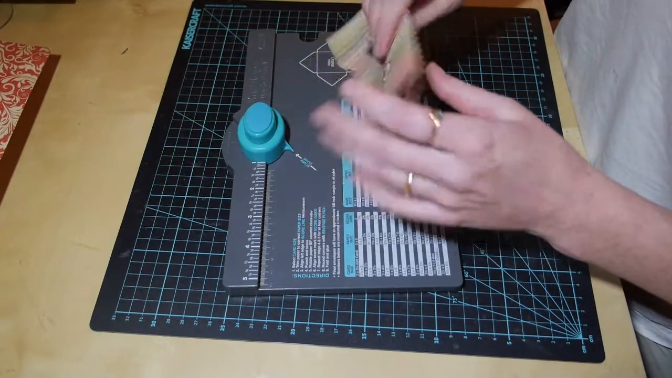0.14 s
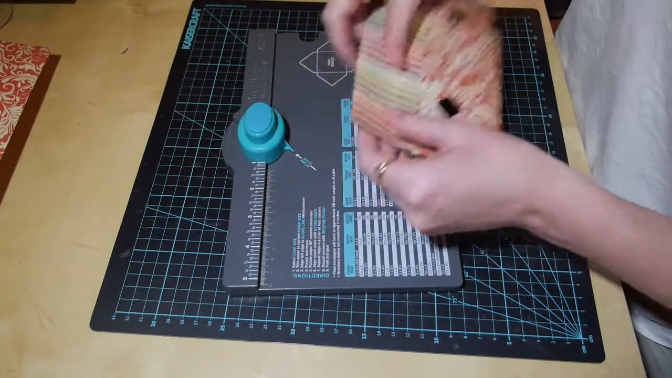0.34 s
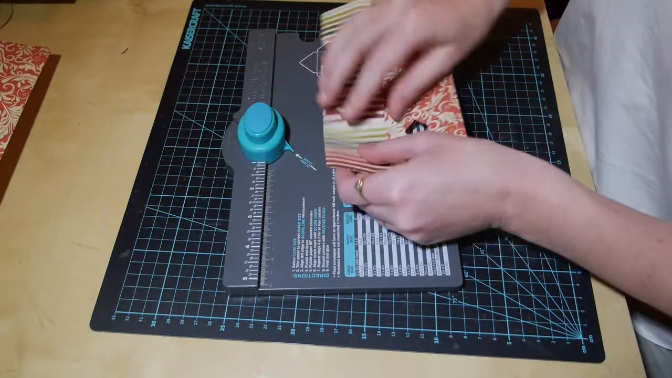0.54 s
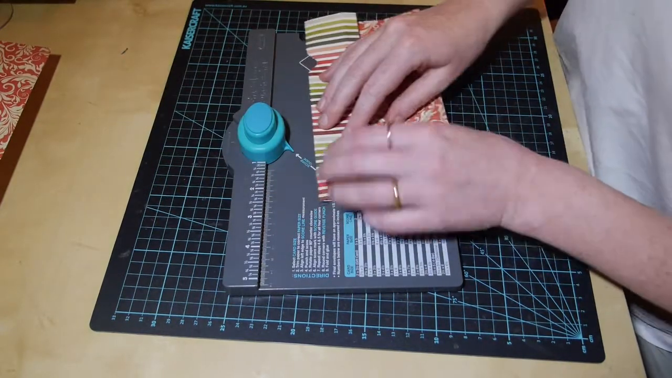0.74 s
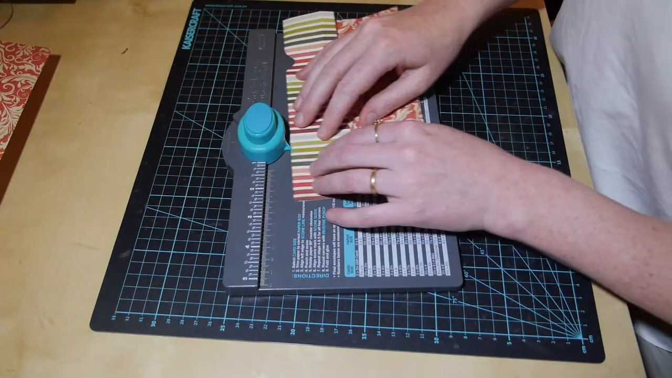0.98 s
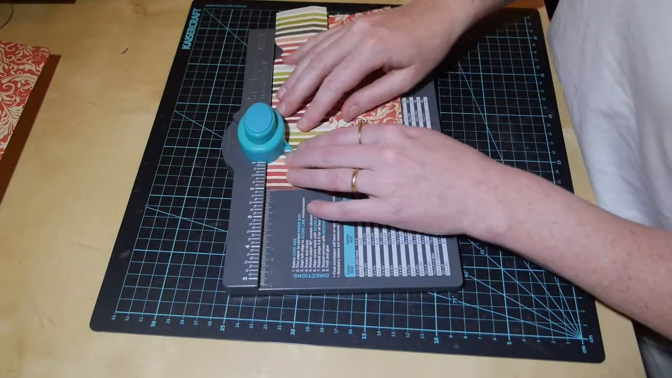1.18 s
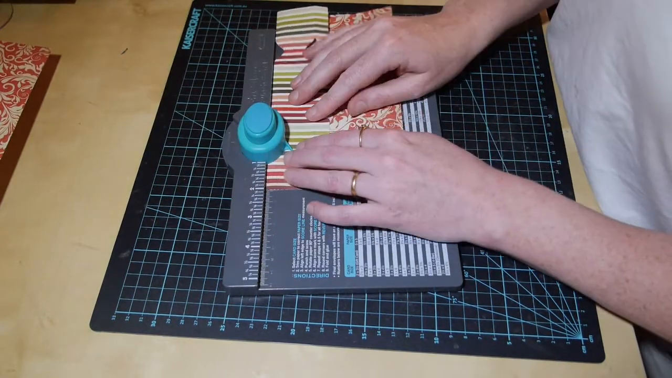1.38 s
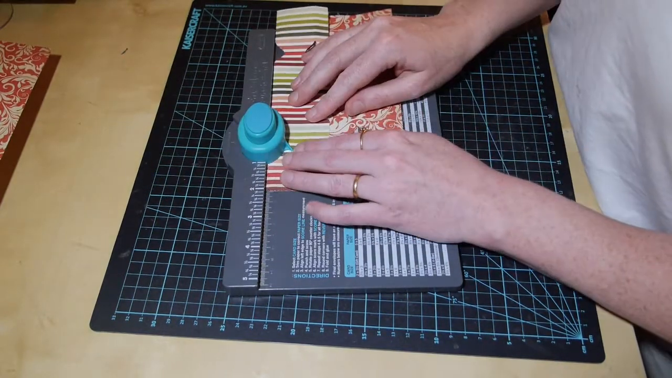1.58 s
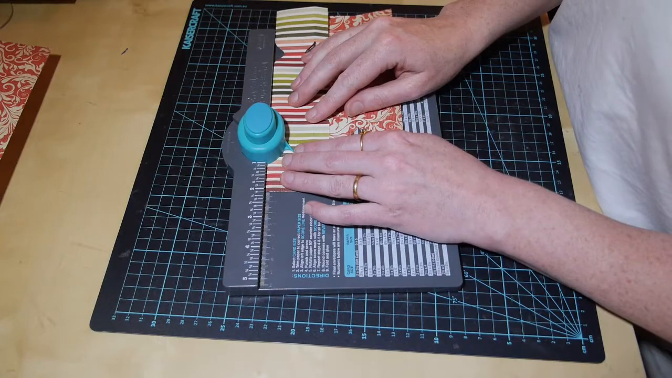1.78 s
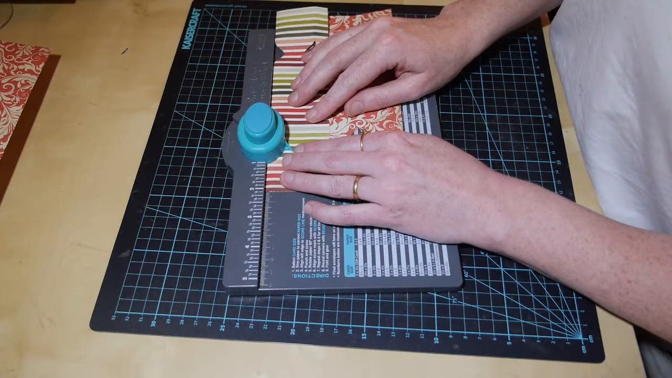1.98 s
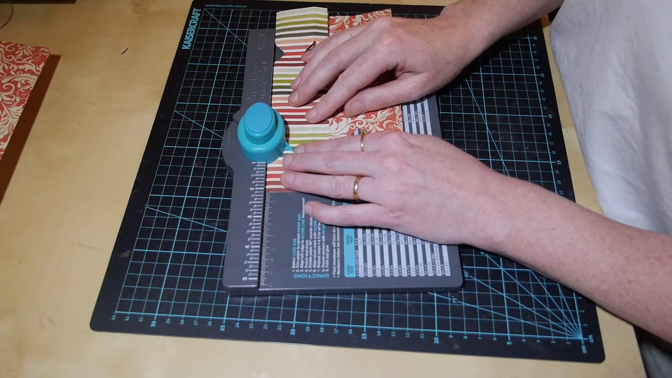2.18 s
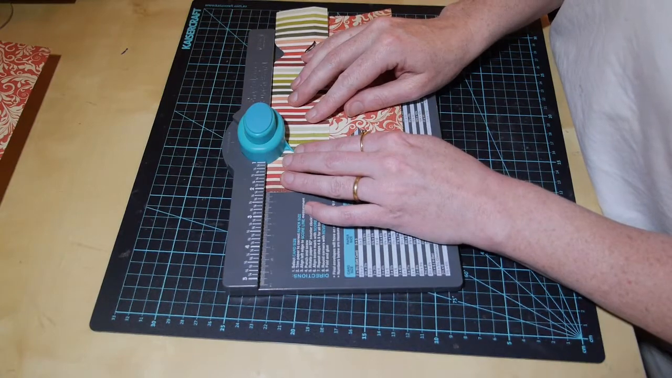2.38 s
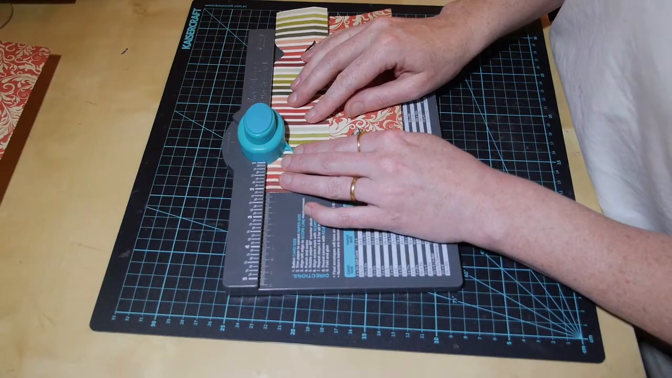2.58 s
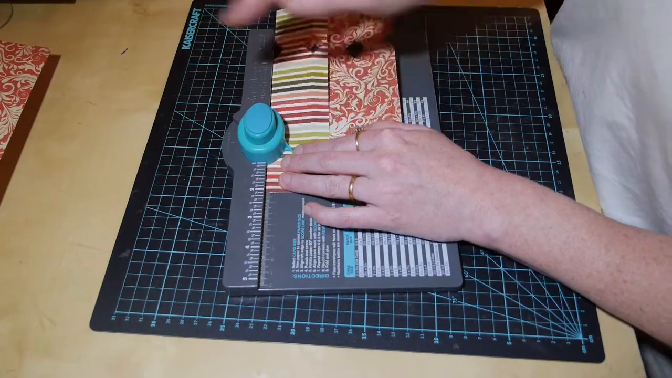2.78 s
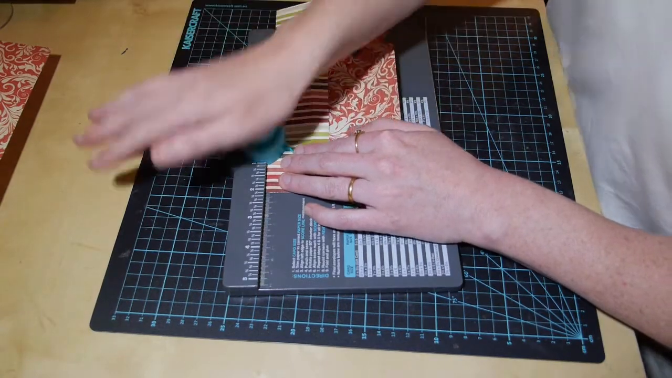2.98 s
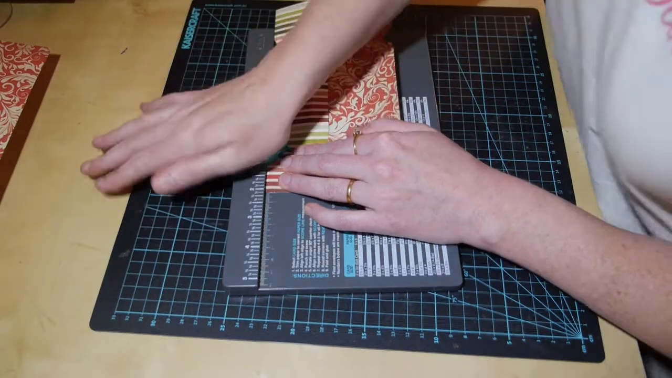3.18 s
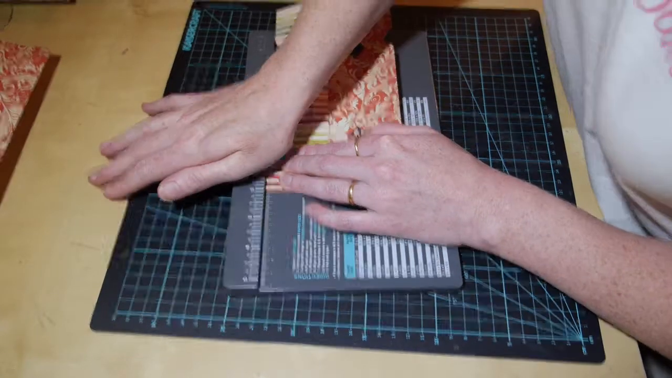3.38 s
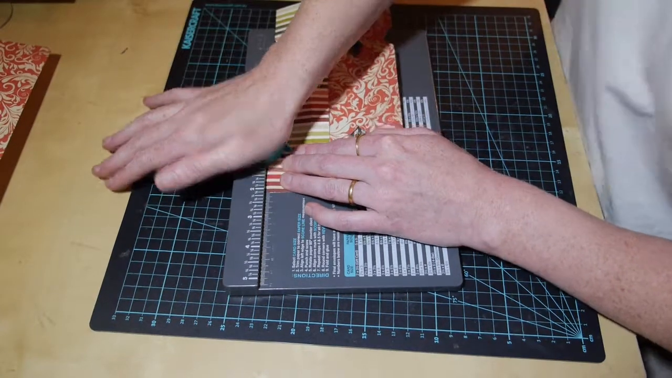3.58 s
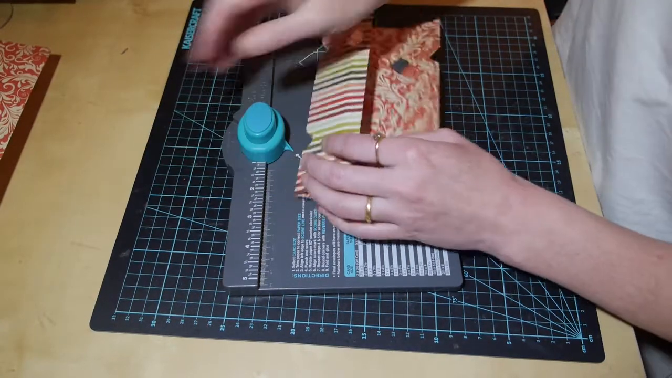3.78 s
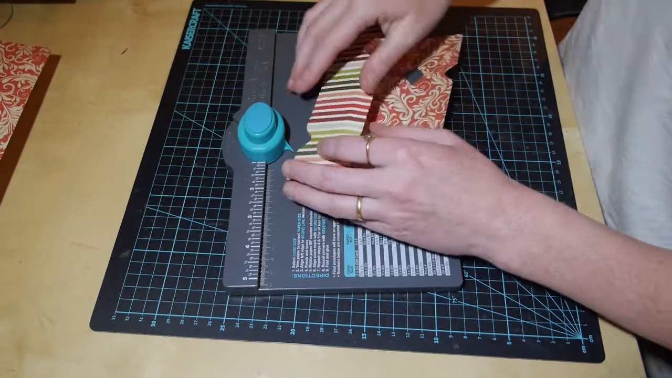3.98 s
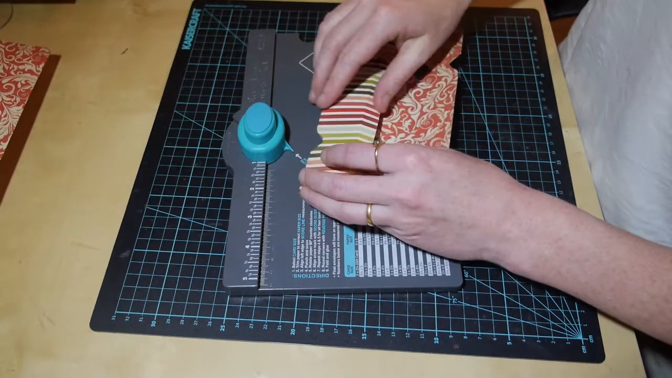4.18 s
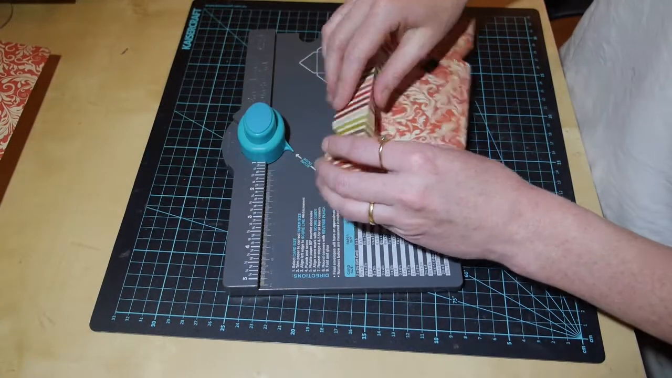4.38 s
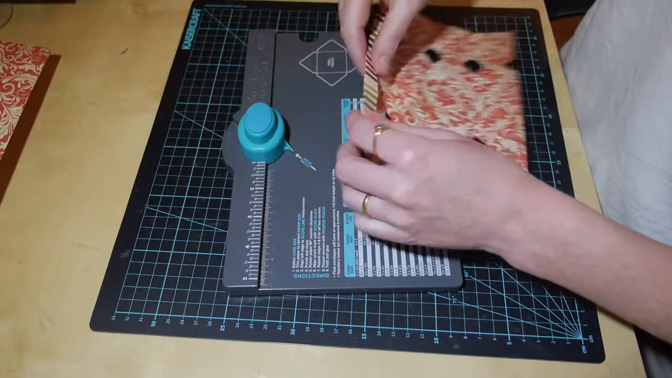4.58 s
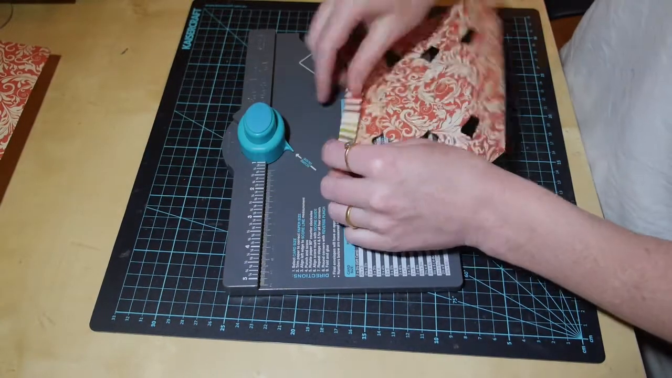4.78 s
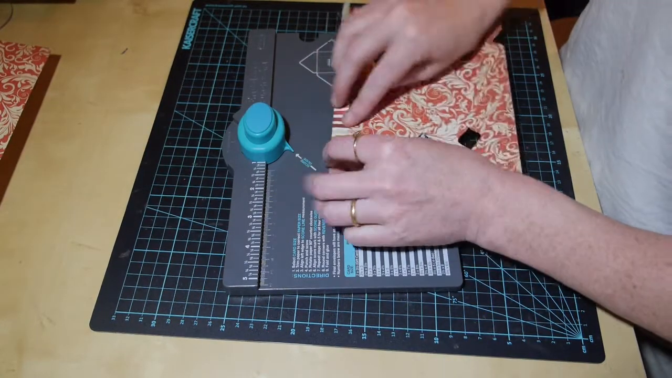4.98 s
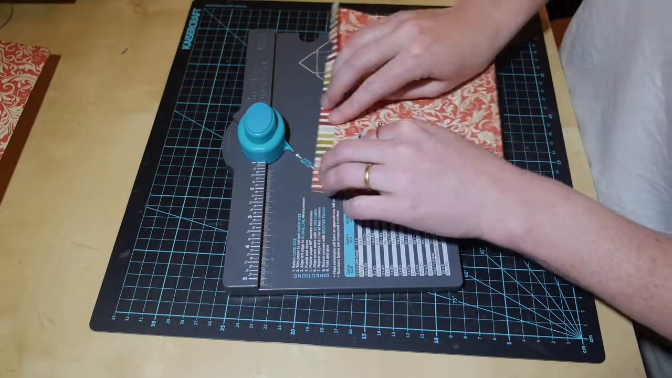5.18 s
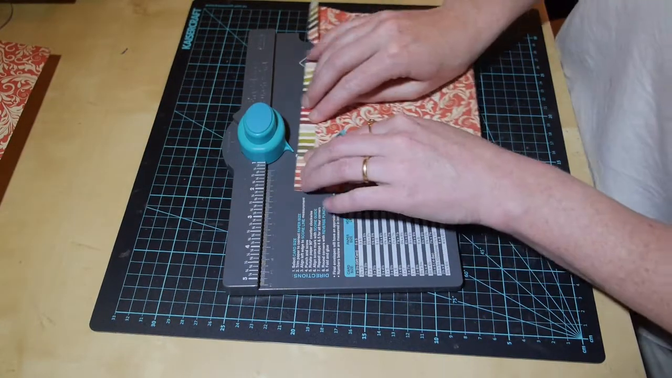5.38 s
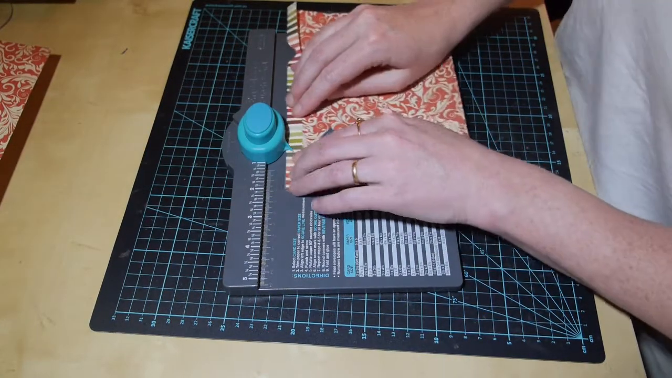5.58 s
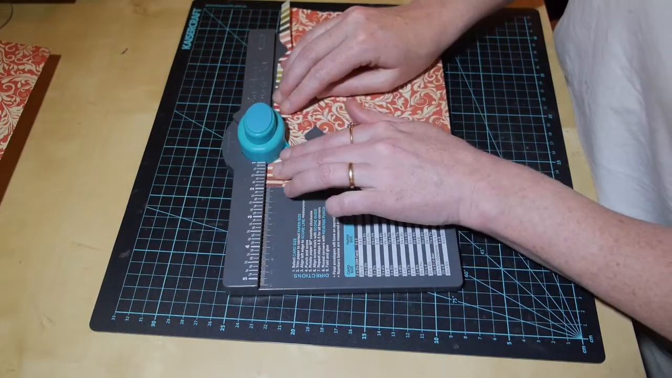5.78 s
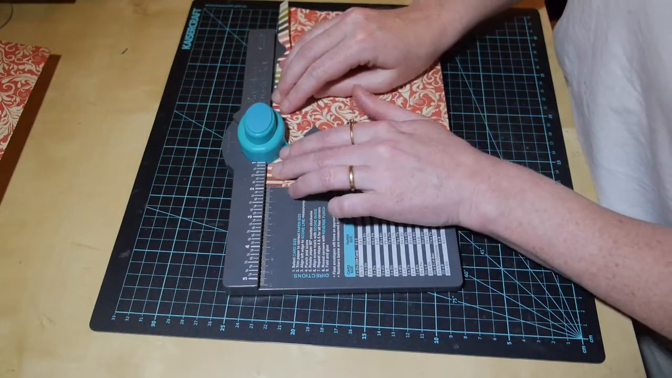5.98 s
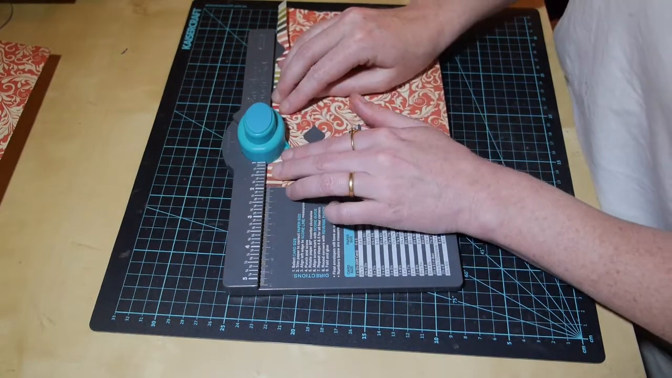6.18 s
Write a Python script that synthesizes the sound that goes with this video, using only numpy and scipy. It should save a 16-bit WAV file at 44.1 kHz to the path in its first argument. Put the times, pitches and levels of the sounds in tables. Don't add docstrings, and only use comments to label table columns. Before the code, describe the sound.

Stiff folded card rustles, flicks and slaps flat on a plastic board, then a hand punch crunches down, clacks back, and the card is shuffled again.

```python
import sys
import numpy as np
from scipy import signal
from scipy.fft import rfft, irfft, next_fast_len
from scipy.io import wavfile
from scipy.ndimage import uniform_filter1d

SR = 44100
rng = np.random.default_rng(int(sys.argv[2]) if len(sys.argv) > 2 else 0)


def transcribe(u):
    v = np.clip(np.atleast_2d(u).T, -1, 1)
    q = np.round(v * 32767).astype(np.int16)
    wavfile.write(sys.argv[1], SR, q)


def to_linear_factor(level_db):
    exponent = np.asarray(level_db, float) / 20
    return 10 ** exponent


N = 275297


def evened(x):
    return x / np.sqrt(np.mean(x ** 2) + 1e-20)


def read(points, hz):
    f, value = np.transpose(points)
    return np.interp(np.log(hz + 1), np.log(f + 1), value)


def add(mix, s, sound):
    part = mix[max(round(s * SR), 0):][:len(sound)]
    part += sound[:len(part)]


def drift(top_hz):
    span = int(SR / top_hz)
    return evened(uniform_filter1d(uniform_filter1d(rng.standard_normal(N), span), span))


def resonate(x, hz, width):
    r = np.exp(-np.pi * width / SR)
    return 2 * signal.lfilter([1 - r], [1, -r * np.exp(2j * np.pi * hz / SR)], x).real


def glide(x, hz, width):
    turn = np.exp(2j * np.pi * np.cumsum(hz) / SR)
    r = np.exp(-np.pi * width / SR)
    still = signal.lfilter([(1 - r) ** 2], [1, -2 * r, r * r], x / turn)
    return 2 * (turn * still).real


def colour(x, points):
    size = next_fast_len(x.shape[-1])
    gain = to_linear_factor(read(points, np.fft.rfftfreq(size, 1 / SR)))
    return irfft(rfft(x, size) * gain, size)[..., :x.shape[-1]]


def band(x, low_hz, high_hz):
    return signal.sosfilt(signal.butter(3, [low_hz, high_hz], "band", fs=SR, output="sos"), x)


def ring(modes, size):
    hz, db, t60 = np.transpose(modes)[:, :, None]
    t = np.arange(size) / SR
    return (to_linear_factor(db - 60 * t / t60) * np.sin(2 * np.pi * hz * t)).sum(0)


def pair(a, b, alike):
    share = np.clip(alike, [0, .01], [SR, .999])
    mid = colour(a, [(f, 10 * np.log10((1 + c) / 2)) for f, c in share])
    side = colour(b, [(f, 10 * np.log10((1 - c) / 2)) for f, c in share])
    return np.array([mid + side, mid - side])


# (peak time [s], scrape level [dB], rise [s], fall [s], hiss share [dB])
TURNING_STROKES = [(0, -39, .01, 0.015, -8), (0.058, -47, 0.048, 0.018, 4), (.19, -50.5, 0.045, 0.028, -9),
                   (.25, -44.5, 0.046, 0.12, -21), (0.339, -42, 0.094, 0.03, 3.5),
                   (.47, -48.5, 0.061, 0.15, -4.5), (.503, -51, .004, 0.046, 2.5),
                   (0.689, -43, 0.044, 0.058, -5.5), (.79, -60, 0.06, 0.097, -2),
                   (.866, -56, 0.024, 0.13, 0.5), (1.12, -55, 0.16, 0.073, -4),
                   (1.18, -49, 0.069, 0.046, -0.5), (1.31, -60.5, 0.14, 0.024, -4),
                   (1.451, -63, 0.083, 0.085, -9), (1.67, -65.5, 0.29, 0.08, -13.5),
                   (2.7, -57, 0.046, 0.049, -8)]
# (peak time
# [s], scrape level [dB], rise [s], fall [s], hiss share [dB])
PRESSING_STROKES = [(3.2, -59.5, 0.067, 0.37, -23), (3.25, -49, .004, 0.067, 1),
                    (3.422, -52, 0.013, .01, -19), (3.51, -44.5, .05, .11, -29),
                    (3.62, -58, 0.41, 0.085, -33), (3.74, -45.5, 0.1, 0.059, -18),
                    (3.86, -57, 0.055, 0.089, -22), (4.0, -65, 0.13, 0.082, -6)]
# (peak time [s], scrape level [dB], rise [s], fall [s], hiss share [dB])
LINING_UP_STROKES = [(4.235, -59.5, 0.044, 0.029, -35.5), (4.262, -70.5, 0.074, 0.024, 10),
                     (4.325, -61.5, 0.032, 0.032, -4), (4.43, -56.5, 0.048, 0.034, -23),
                     (4.5, -62.5, 0.017, 0.038, -1), (4.572, -56.5, 0.029, 0.012, -3),
                     (4.665, -59, 0.03, 0.037, -1), (4.755, -60, 0.033, 0.098, -4),
                     (4.81, -54.5, 0.08, 0.2, -7.5), (4.96, -51, 0.017, 0.23, -2),
                     (5.079, -55, 0.16, 0.013, -21), (5.16, -60, 0.085, 0.17, -4),
                     (5.279, -52.5, 0.12, 0.023, 0.5), (5.4, -57.5, 0.12, 0.26, -2),
                     (5.6, -63.5, 0.078, 0.079, -3), (5.75, -56.5, 0.14, 0.064, -3),
                     (5.81, -55.5, 0.075, 0.053, -40), (5.9, -75, 0.047, 0.18, -17),
                     (6.15, -64.5, 0.22, 0.22, -10)]
RESTING_DB, STROKE_POINT = -78, 1.43


def strokes():
    t = np.arange(0, N + 64, 64) / SR
    rows = TURNING_STROKES + PRESSING_STROKES + LINING_UP_STROKES
    s, db, rise, fall, hiss_db = np.transpose(rows)[:, :, None]
    away = np.where(t < s, (s - t) / rise, (t - s) / fall)
    each = to_linear_factor(db - 10 * np.minimum(away, 20) ** STROKE_POINT)
    gains = []
    for swells in (each, each * to_linear_factor(hiss_db)):
        total = np.sqrt((swells ** 2).sum(0) + to_linear_factor(RESTING_DB) ** 2)
        gains.append(np.interp(np.arange(N) / SR, t, total))
    return gains


# (time [s], frequency [Hz])
SCRAPE_PITCH = [(0.0, 2600), (0.32, 4340), (0.43, 2390), (0.6, 2370), (0.72, 2820), (0.92, 2728),
                (1.03, 2240), (1.23, 2320), (1.4, 2590), (2.7, 3386), (3.8, 2261), (4.2, 2934),
                (4.43, 2537), (4.57, 3360), (4.66, 2694), (5.59, 2540), (5.73, 1913), (6.24, 2230)]
# (frequency [Hz], level [dB per Hz])
FIBRE_HISS = [(2940, -24.5), (5000, -3.5), (6000, -6.5), (11800, -8.5), (13900, -17.5), (14900, -27.5),
              (15500, -25.5), (16000, -57.5)]
# (frequency [Hz], width [Hz], level [dB])
BOARD_DRONE = [(595.6, 660, -4), (845, 160, 1.5), (1300, 650, 5.5)]
DRONE_DB, DRONE_FOLLOW = -61.5, 0.9


def slide():
    t = np.arange(N) / SR
    gain, hiss_gain = strokes()
    grains = rng.standard_normal((3, N)) * to_linear_factor(2.7 * np.minimum(rng.exponential(1, N), 5))
    own_wander = np.array([drift(top_hz=60) for _ in grains])
    grains *= to_linear_factor(2.14 * drift(top_hz=203) + 2.07 * own_wander)
    hz = np.interp(t, *np.transpose(SCRAPE_PITCH)) * (1 + 0.12 * drift(top_hz=30.2))
    scrape = glide(grains[0], hz, 920)
    wide = np.gradient(resonate(resonate(grains[0], 2600, 2890), 2600, 2904))
    bent_card = evened(evened(scrape) + to_linear_factor(9.0) * evened(wide))
    hiss = evened(colour(grains[1], FIBRE_HISS))
    drone = sum(to_linear_factor(db) * resonate(resonate(grains[2], f, w), f, 3 * w) for f, w, db in BOARD_DRONE)
    drone_gain = to_linear_factor(DRONE_DB) * (gain / to_linear_factor(-54.5)) ** DRONE_FOLLOW
    return gain * bent_card + hiss_gain * hiss + drone_gain * evened(drone)


# (start time [s], length [s],
# level [dB], frequency [Hz], width [Hz])
RUB_TONES = [(1.065, 0.064, -54, 2180, 170), (0.78, .06, -67, 1660, 120),
             (1.14, .085, -54.5, 1720, 290), (1.006, 0.046, -63.5, 836, 61),
             (1.125, 0.097, -65, 5800, 250), (1.3, .06, -68, 3200, 350), (1.166, .06, -62, 3260, 250),
             (1.216, .034, -60, 880, 220), (1.211, .04, -58, 1410, 160),
             (1.292, .018, -55.5, 4550, 600), (3.771, 0.083, -55, 1400, 180),
             (5.72, .16, -60.5, 1730, 200), (5.89, .12, -70.5, 1750, 110), (6.09, 0.11, -67, 1800, 130),
             (6.198, .045, -61, 2000, 170), (5.86, 0.33, -72, 5100, 440),
             (.04, 0.021, -43, 4000, 696), (0.156, 0.018, -54, 2980, 700), (.26, 0.017, -48, 3900, 300),
              (.29, .04, -42.5, 5000, 350), (2.702, 0.038, -56.5, 820, 200), (4.092, 0.028, -61, 775, 200),
              (4.213, 0.051, -56.5, 3120, 350), (4.216, 0.055, -57.5, 2450, 300),
              (4.219, 0.034, -59.5, 4740, 600), (4.314, 0.03, -60, 2400, 400),
              (4.407, 0.045, -60.5, 3000, 400), (4.41, .05, -65, 1910, 300), (4.477, 0.048, -65, 2300, 350),
              (4.534, 0.017, -62, 3200, 400), (4.56, .025, -66, 1920, 250), (4.651, 0.04, -65, 1700, 350),
              (4.66, 0.057, -66, 2300, 300), (4.74, 0.045, -60, 3080, 450), (4.734, 0.046, -63, 1900, 300),
              (4.831, 0.046, -48, 3100, 900), (4.97, 0.027, -47, 4840, 250),
              (5.008, 0.049, -53.5, 805, 130), (5.052, 0.028, -48.5, 740, 510),
              (5.106, 0.028, -56, 910, 200), (5.167, .018, -58, 1680, 250), (5.209, 0.063, -56.5, 870, 160),
              (5.267, 0.026, -54.5, 1700, 200), (5.379, 0.09, -63.5, 830, 172),
              (5.814, 0.019, -45.5, 1620, 350), (5.815, 0.011, -46, 3100, 300),
              (6.187, 0.013, -60, 600, 300), (6.109, 0.012, -52, 8400, 4000)]


def whistles():
    out = np.zeros(N)
    for s, length, db, hz, width in RUB_TONES:
        rub, grip = rng.standard_normal((2, round(length * SR)))
        rub = rub * to_linear_factor(3.0 * evened(uniform_filter1d(grip, size=130)))
        tone = evened(resonate(resonate(rub, hz, width), hz, width))
        add(out, s, to_linear_factor(db) * np.hanning(len(rub)) ** 0.34 * tone)
    return out


def clack(rows, modes, spread, rise_s, detune=0.064):
    out, t = np.zeros(N), np.arange(2048) / SR
    noise = rng.standard_normal((len(rows), 3, len(t)))
    grips = 1 + detune * rng.uniform(-1.15, 1, (len(rows), len(modes)))
    for (s, db, hz, body_db, treble_db, contact_ms), rattle, grip in zip(rows, noise, grips):
        envelope = (1 - np.exp(-t / rise_s)) * np.exp(-1000 * t / contact_ms)
        a, b, c = rattle * abs(rattle[::-1]) * envelope
        a[1] += 2
        b[1] += 1
        width = spread * hz
        crack = resonate(resonate(resonate(a, hz, width), hz, width), hz, 2 * width)
        held_modes = modes * np.c_[grip, grip ** 0, grip ** 0]
        body = signal.fftconvolve(b, ring(held_modes, size=6144))
        spit = resonate(resonate(c, 7980, 5000), 7980, 5000)
        for part, share_db in ((crack, 0), (body, body_db), (spit, treble_db)):
            add(out, s, to_linear_factor(db + share_db) * part / abs(part).max())
    return out


# (time [s], peak level [dB], crack frequency [Hz], board share [dB], contact [ms])
CARD_TAPS = [(0.0, -36, 2460, -4, 2.4), (0.012, -40, 2190, 8, 5), (0.042, -26.5, 2150, -2.5, 6.2),
             (0.191, -40.5, 2460, 3.5, 7.9), (0.279, -39.5, 1800, 5.5, 3), (0.346, -16, 3100, -9.5, 5.9),
             (0.374, -26.5, 1600, -5, 5.7), (0.442, -29.5, 1616, -3, 4.2), (0.503, -34.5, 1500, 12, 7.6),
             (0.632, -34.5, 2546, -5.5, 3.5), (0.694, -40, 3220, 1, 1.3), (0.745, -40.5, 1200, 3, 4.5),
             (0.867, -43.5, 1710, -0.5, 4.4), (1.297, -44.5, 1750, -5, 1.4), (1.417, -46, 4200, -6.5, 2.1),
             (1.963, -49, 3200, -9, 2.8), (3.095, -51, 1620, 10, 1.34), (3.878, -42.5, 2130, -4, 4.2),
             (4.48, -47, 2250, -10, 2.2), (4.557, -52, 2340, -9, 3.2), (4.825, -32, 2800, -8, 9.3),
             (4.974, -31.5, 2130, -4, 6.5), (5.124, -42.5, 1717, -7, 7.7)]
# (time
# [s], peak level [dB], crack frequency [Hz], contact [ms])
FOLD_POPS = [(0.071, -34, 3300, 3.1), (0.166, -45, 2470, 6), (0.276, -25, 1700, 1.66),
             (3.033, -62, 3300, 1.5), (3.056, -53, 3300, 1.7), (0.719, -44.5, 3350, 2.5),
             (3.754, -30.5, 3700, 2.27), (4.352, -47, 2390, 2.9), (4.655, -48, 1750, 2.1),
             (5.017, -31, 3300, 6.5), (5.278, -43, 1680, 2.5), (5.764, -43, 2344, 8.2),
             (6.113, -36, 5150, 3)]
# (time [s], peak level [dB], crack frequency [Hz], treble share [dB], contact [ms])
EDGE_FLICKS = [(0.654, -26, 2600, -14, 2.7), (0.6615, -20.5, 2690, -14, 1.6), (0.858, -41.5, 4300, 3, 2.5),
               (1.027, -42.5, 2350, -3, 2.8), (1.232, -55, 1860, -7, 2.5), (2.686, -49, 4110, 7, 1.9),
               (2.713, -31.5, 3200, -8, 2), (2.726, -36, 3570, -9, 3.6), (3.132, -45.5, 1864, -7, 2.7),
               (3.768, -32, 1610, -4, 4), (3.842, -41.5, 2060, -1, 3.8), (3.951, -48, 2330, -7, 5.9),
               (4.085, -42, 2490, -6, 2.4), (4.097, -32, 2740, -6.5, 3.2), (4.573, -39.5, 4000, -6, 5.4),
               (4.955, -39, 2380, 9, 4), (5.029, -38, 2330, -5, 1.8), (5.057, -30.5, 2020, 3.5, 4.3),
               (5.587, -54, 2676, 15, 3), (5.816, -30, 2380, -2.5, 1.2), (6.143, -48, 2300, -8, 1.2),
               (6.188, -38, 1500, -18, 1.1)]
# (frequency [Hz], level [dB], t60 [s])
BOARD_MODES = [(650, -9, 0.061), (792, 2, 0.042), (933, -12, 0.06), (1090, -6, 0.031), (1376, -8.5, 0.084),
               (1600, -9.5, 0.027)]
# (frequency [Hz], level [dB], t60 [s])
EDGE_MODES = [(1672, -4.5, 0.044), (3110, -11, 0.033), (4070, -2.5, 0.032), (5030, -6, 0.024)]
TAP_TREBLE_DB, POP_TREBLE_DB = -19, -18.5
POP_BOARD_DB, FLICK_BOARD_DB = -19, -7


def card():
    small = [(s, db, hz, board_db, TAP_TREBLE_DB, ms) for s, db, hz, board_db, ms in CARD_TAPS]
    small += [(s, db, hz, POP_BOARD_DB, POP_TREBLE_DB, ms) for s, db, hz, ms in FOLD_POPS]
    flicks = [(s, db, hz, FLICK_BOARD_DB, treble_db, ms) for s, db, hz, treble_db, ms in EDGE_FLICKS]
    knocks = clack(small, BOARD_MODES, spread=0.81, rise_s=0.000798)
    edges = clack(flicks, EDGE_MODES, spread=0.79, rise_s=0.00036, detune=0.035)
    return knocks + band(edges, low_hz=1180, high_hz=15400)


# (time [s], peak level [dB], crack frequency [Hz], board share [dB], contact [ms])
FLAT_SLAPS = [
    (.4996, -13.5, 2600, 0, 0.5),
    (0.5009, -14, 2600, 3, 0.59),
    (4.8221, -18, 3300, -4, 0.89),
    (4.8234, -25, 2850, -2.5, 3.8),
]
# (frequency [Hz], level [dB], t60 [s])
SLAB_MODES = [(1386, -8, 0.13), (1700, -2.5, .008), (2000, 0, 0.007), (2450, -0.5, 0.0089),
              (3200, 1, 0.008), (4000, 1.5, 0.007), (4600, -11.5, .04)]
SLAP_TREBLE_DB = -20


def slaps():
    rows = [(s, db, hz, board_db, SLAP_TREBLE_DB, ms) for s, db, hz, board_db, ms in FLAT_SLAPS]
    crack = clack(rows, SLAB_MODES, spread=0.73, rise_s=0.00017, detune=0.0089)
    return band(band(crack, low_hz=1270, high_hz=15000), low_hz=1098, high_hz=14100)


# (time [s], peak level [dB],
# frequency [Hz], t60 [s])
MODE_PINGS = [(.5011, -7.5, 2000, 0.015), (.5011, -14.5, 1760, 0.015), (.5011, -9.5, 3220, .013),
              (.5011, -15.5, 2660, 0.026), (.5318, -33, 4000, .015), (.5011, -16.5, 4350, .012),
              (.3468, -20.5, 2950, .025), (.3468, -28, 3900, .02), (.3472, -29.5, 760, .025),
              (.6618, -20.5, 2950, .02), (.746, -41.5, 1000, 0.045), (.192, -40.5, 560, 0.075),
              (.2775, -34.5, 790, .05), (3.4314, -19, 4800, .02), (3.2490, -28, 4600, .03),
              (4.8218, -24.5, 4130, .02), (4.9755, -37, 1235, .03), (3.4311, -18.5, 2260, 0.032),
              (3.4318, -18, 700, 0.022), (3.6663, -18.5, 2500, 0.038), (3.6664, -24, 830, 0.056),
              (3.638, -35, 815, .1), (4.8217, -17, 3100, 0.015), (4.822, -22, 2460, 0.016),
              (4.8232, -35.5, 1366, 0.16), (4.8240, -24.5, 1880, .03), (4.8227, -28.5, 1600, 0.03),
              (4.826, -34.5, 957, 0.1), (4.826, -32, 820, 0.057), (4.8225, -34, 3420, 0.086),
              (6.1127, -36, 4120, 0.026), (6.113, -42, 2950, .025), (6.1132, -44, 2450, .03),
              (6.1435, -44.5, 2120, 0.033), (6.188, -40, 1730, 0.022)]
PING_RISE_S = 0.00019


def pings():
    out = np.zeros(N)
    onset = 1 - np.exp(-np.arange(8192) / SR / PING_RISE_S)
    for s, db, hz, t60 in MODE_PINGS:
        add(out, s, ring([(hz, db, t60)], size=8192) * onset)
    return out


# (time [s], peak level [dB], shell share [dB], treble share [dB], contact [ms])
PUNCH_BITE = [
    (3.1600, -31, 3.5, -30, 3.1),
    (3.2440, -21.5, 3.5, -2, 5.7),
    (3.2480, -12.5, 0, -23, 0.78),
    (3.2505, -18, 2, -2.5, 1.16),
    (3.2533, -21.5, 0, -20, 9.5),
    (3.2825, -38.5, 17.5, 6, 7.9),
    (3.2920, -37, 11.5, -12, 2.1),
]
# (time [s], peak level [dB], shell share [dB], treble share [dB], contact [ms])
PUNCH_BOTTOM = [
    (3.4257, -25, 7, 6, 5.2),
    (3.4311, -9, -6, -9, 1.5),
    (3.4330, -13, -3, -13.5, 1.8),
    (3.4355, -15, -8, -14.5, 2.2),
    (3.439, -35, -5, -18, 3.2),
]
# (time [s], peak level [dB], board share [dB], treble share [dB], contact [ms])
PUNCH_SPRING = [
    (3.6375, -32, 5.5, -30.5, 7),
    (3.6562, -17, 1.5, -11.5, 3.9),
    (3.6664, -11.5, -2.5, -10, 1.13),
    (3.6735, -20, 2, -16, 2.7),
    (3.6690, -22.5, -1.5, -7, 13),
]
# (frequency [Hz], level [dB], t60 [s])
SHELL_MODES = [(565, -8, 0.012), (810, -3, 0.018), (870, -5.5, 0.021), (980, 2, 0.013), (1230, -7.5, 0.046),
               (1392, -12.5, 0.059)]
# (frequency [Hz], level [dB], t60 [s])
BASE_MODES = [(646, -7, 0.028), (813, 0.5, 0.039), (1040, -10, 0.038), (1410, -0.5, 0.079),
              (1600, -5, 0.037), (2280, -5, 0.032), (2540, -2, 0.027), (2760, -18, .015),
              (4200, -3.5, 0.021), (5200, -13, 0.033)]
BITE_HZ, BOTTOM_HZ, SPRING_HZ = 2800, 3200, 2200


def punch():
    down = [(s, db, BITE_HZ, *rest) for s, db, *rest in PUNCH_BITE]
    down += [(s, db, BOTTOM_HZ, *rest) for s, db, *rest in PUNCH_BOTTOM]
    up = [(s, db, SPRING_HZ, *rest) for s, db, *rest in PUNCH_SPRING]
    pressed = clack(down, SHELL_MODES, spread=1.0, rise_s=0.00042)
    freed = clack(up, BASE_MODES, spread=0.64, rise_s=0.00045, detune=0.0073)
    return pressed + band(freed, low_hz=730, high_hz=12300)


# (time [s], peak level [dB], push frequency [Hz])
TABLE_PUSHES = [(0.04, -40.5, 457), (0.191, -39, 454), (0.345, -35, 447), (0.502, -44.5, 156),
                (0.67, -43.5, 161.8), (0.72, -55, 104), (0.877, -51, 108), (2.712, -51.5, 440),
                (3.161, -34, 442), (3.245, -21.5, 152), (3.095, -53.5, 150), (3.248, -23, 404),
                (3.283, -21, 460), (3.4257, -12, 343), (3.432, -22, 136), (3.658, -31, 273),
                (4.822, -46, 179), (5.047, -54.5, 99), (5.799, -68, 91.3)]
# (frequency [Hz], level [dB], t60 [s])
TABLE_MODES = [(112.2, 0.5, 0.16), (122.7, -1.5, 0.13), (155.6, -1, 0.1294), (226.3, -9.5, 0.352),
               (292.4, -10, 0.28), (423, -2, .13)]


def thumps():
    out, ringing = np.zeros(N), ring(TABLE_MODES, size=16000)
    for s, db, hz in TABLE_PUSHES:
        u = np.arange(0, 1.6, hz / SR)
        push = np.sin(2 * np.pi * u) * np.sin(np.pi * u / u[-1])
        tail = signal.fftconvolve(push, ringing)
        add(out, s, to_linear_factor(db) * push)
        add(out, s, to_linear_factor(db - 14.5) * tail / abs(tail).max())
    return out


# (frequency [Hz], t60 [s])
ROOM_DECAY = [(100, 0.62), (300, 0.24), (700, 0.39), (1800, 0.33), (3500, 0.3), (6000, 0.34), (12000, 0.26)]
# (frequency [Hz], likeness [0-1])
ROOM_LIKENESS = [(100, 1), (500, 0.86), (2000, 0.92), (5000, 0.82), (12000, .2)]
# (delay [s], level [dB])
EARLY_ECHOES = [(.0032, -21), (.0058, -16.5), (.0075, -12), (0.014, -19.5), (.017, -17), (0.023, -16.5),
                (0.0322, -17.5)]


def room(clicks, rest):
    hz, t, z = signal.stft(rng.standard_normal((2, 3, SR // 2)), SR, nperseg=256)
    fade = to_linear_factor(-60 * t / read(ROOM_DECAY, hz)[:, None])
    z = z / abs(z) ** .6 * fade
    z *= np.linalg.norm(fade, axis=-1, keepdims=True) / np.linalg.norm(z, axis=-1, keepdims=True)
    tails = signal.istft(z, SR, nperseg=256)[1]
    tails *= 1 - np.exp(-np.arange(tails.shape[-1]) / SR / 0.0014)
    tails = to_linear_factor(-8.5) * pair(*tails, ROOM_LIKENESS) / np.linalg.norm(tails[0, 0])
    turn = 2 * np.pi * (140 * np.arange(N) / SR + np.arange(3)[:, None] / 3)
    parts = clicks * np.sqrt(2 / 3) * np.cos(turn)
    parts[0] += rest
    out = signal.fftconvolve(parts[None], tails, axes=2).sum(1)[:, :N]
    for s, db in EARLY_ECHOES:
        sides = np.array([[1], [rng.uniform(0.19, 1)]])
        out += to_linear_factor(db) * np.roll(clicks + rest, round(s * SR)) * sides
    return out


# (frequency [Hz], level [dB], waver [dB])
HUM_LINES = [(101, -80.5, 2.5), (200, -79.5, 2), (300, -80, 1.5), (403, -74.5, 2), (591, -76.5, 1.2),
             (778, -86, 4.5), (11340, -91, 0.35)]
# (time [s], level [dB])
BUZZ_LEVEL = [
    (1.9, -110),
    (2.0, -78),
    (2.3, -75),
    (2.6, -76),
    (3.1, -79),
    (3.2, -110),
]
MAINS_HZ = 50


def hum():
    t, lines = np.arange(N) / SR, np.zeros(N)
    for hz, db, waver_db in HUM_LINES:
        level = to_linear_factor(db + 3.5 + waver_db * drift(top_hz=9.95))
        lines += level * np.sin(2 * np.pi * (hz * t + rng.random()))
    ticks = np.diff(np.floor(t * MAINS_HZ + 0.37), prepend=0) * to_linear_factor(1.6 * rng.standard_normal(N))
    upper = resonate(resonate(ticks, 3120, 450), 3120, 900)
    buzz = evened(upper + 0.51 * resonate(ticks, 1350, 400))
    return lines + to_linear_factor(np.interp(t, *np.transpose(BUZZ_LEVEL))) * buzz


# (frequency [Hz], level [dB per Hz])
AIR_NOISE = [(12, -26), (36, -21), (55, -28.5), (400, -24.5), (800, -29.5), (3160, -36), (11800, -54.5),
             (16000, -74.5)]
# (frequency [Hz], likeness [0-1])
NOISE_LIKENESS = [(60, 0.98), (180, 0.87), (550, 0.4), (1650, 0.71), (4970, 0.75), (15000, 0.58)]
FLOOR_DB = -64.5


def floor():
    air = evened(colour(rng.standard_normal((2, N)), AIR_NOISE))
    hiss = evened(np.gradient(np.gradient(rng.standard_normal((2, N)), axis=1), axis=1))
    return to_linear_factor(FLOOR_DB - 3.5) * evened(pair(*(air + to_linear_factor(-15.5) * hiss), NOISE_LIKENESS))


# (frequency [Hz], level [dB])
MIC_RESPONSE = [(20, 3), (4300, -1.5), (5100, -1.5), (5800, -2.5), (9000, -5), (12000, -4), (15500, -9.5),
                (17000, -35.5)]
SLAP_WET_DB, PUNCH_WET_DB = -2.5, 0.5


def scene():
    no_bass = signal.butter(3, 480, "high", fs=SR, output="sos")
    parts = signal.sosfilt(no_bass, [card(), slaps() + pings(), punch()])
    clicks = parts.sum(0)
    sent = to_linear_factor(np.array([0, SLAP_WET_DB, PUNCH_WET_DB])) @ parts
    table, rustle = thumps(), slide() + whistles()
    skew = 0.24 * np.gradient(clicks) + 0.34 * np.gradient(np.roll(rustle, 90))
    direct = clicks + table + rustle + np.array([skew, -skew])
    heard = direct + room(sent, table + to_linear_factor(-1.5) * rustle)
    low_cut = signal.butter(3, 85, "high", fs=SR, output="sos")
    return signal.sosfilt(low_cut, colour(heard, MIC_RESPONSE)) + hum() + floor()


def band_limit(x):
    return signal.sosfilt(signal.butter(12, 16100, fs=SR, output="sos"), x)


def record(dry):
    mix = dry - 0.0028
    return band_limit(mix)


dry = scene()
out = record(dry)
transcribe(out)
```